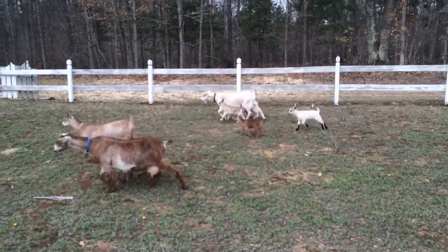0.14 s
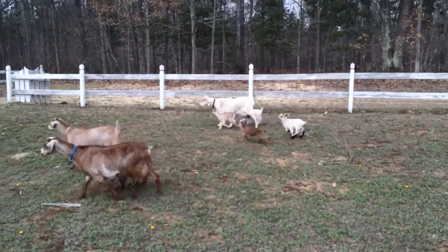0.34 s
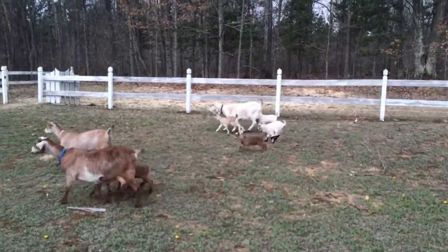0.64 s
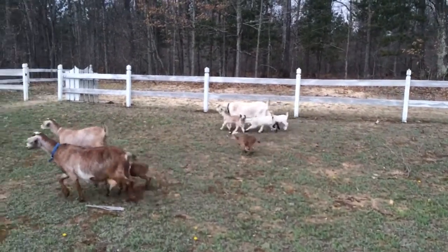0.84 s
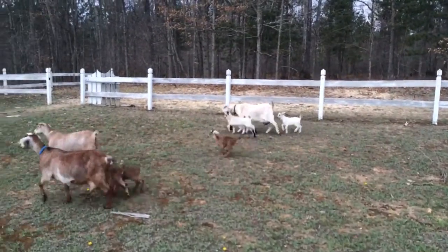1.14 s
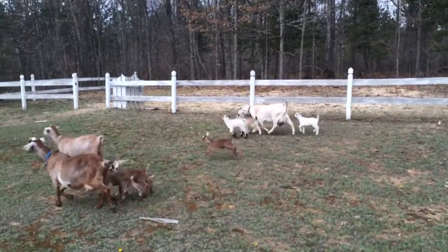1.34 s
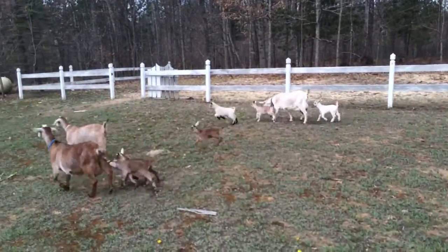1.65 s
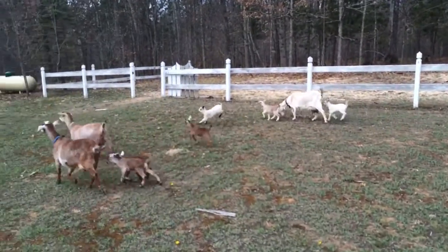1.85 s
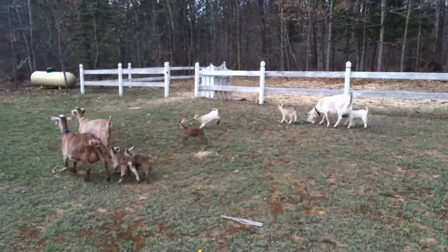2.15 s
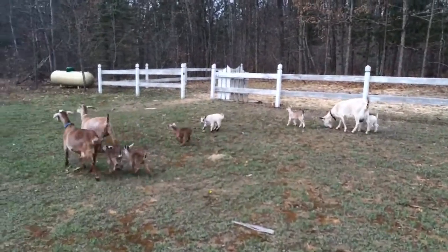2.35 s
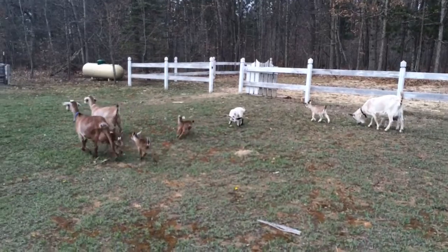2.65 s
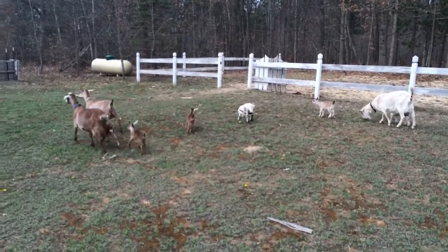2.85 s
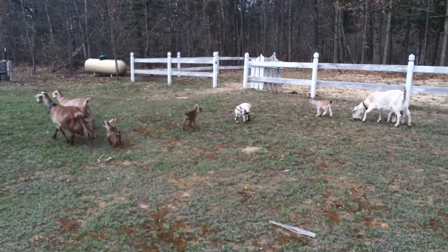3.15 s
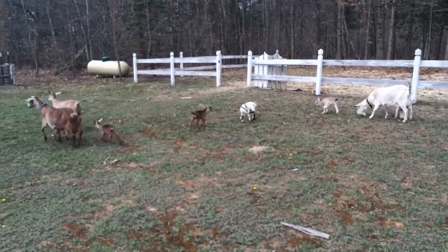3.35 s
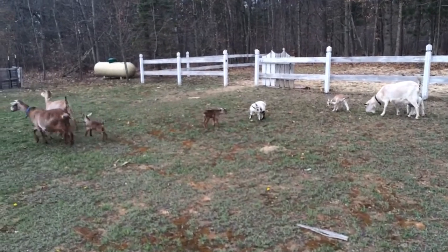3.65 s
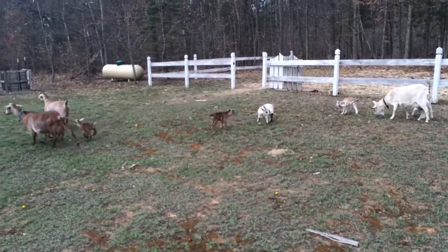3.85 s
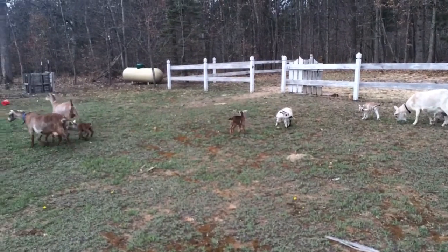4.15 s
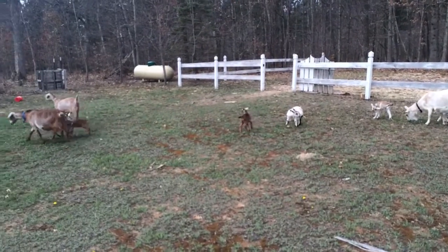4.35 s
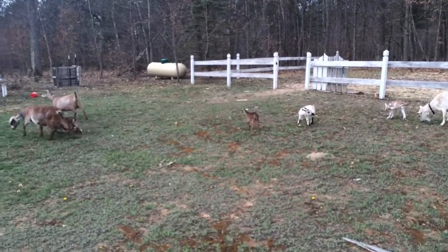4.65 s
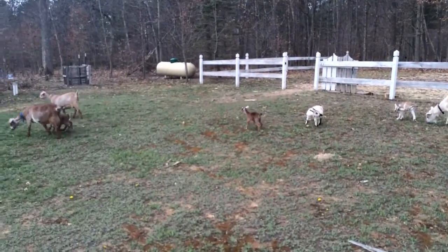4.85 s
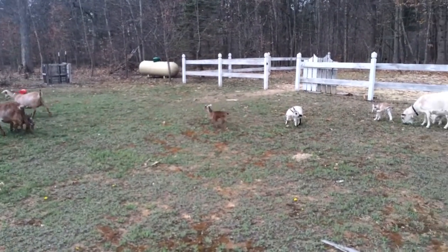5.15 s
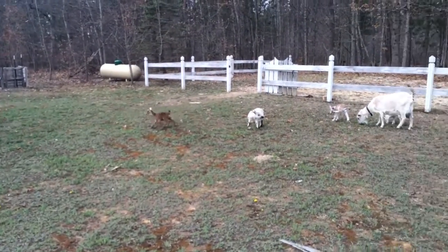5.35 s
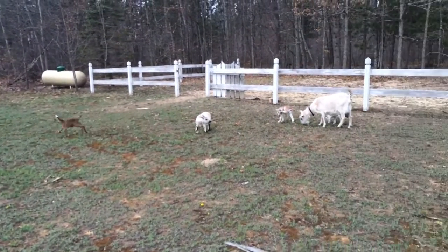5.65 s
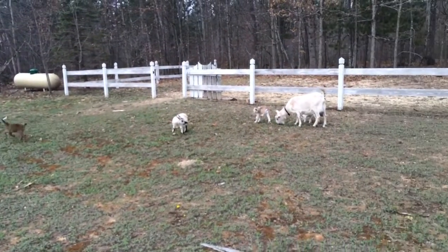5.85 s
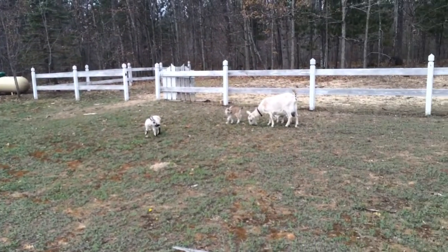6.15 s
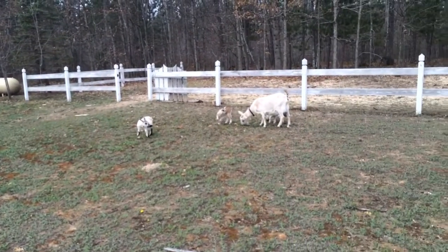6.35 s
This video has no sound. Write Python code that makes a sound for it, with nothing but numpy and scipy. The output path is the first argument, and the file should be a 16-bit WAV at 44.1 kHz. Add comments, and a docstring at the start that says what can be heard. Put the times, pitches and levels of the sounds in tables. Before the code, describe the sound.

High quavering kid bleats, including one long trembling call, echo faintly off nearby woods while wind rumbles and dry grass ticks.

```python
"""In a grassy yard at the edge of a wood, goat kids bleat and the wood throws the calls back.
A bleat is a row of sharp voice pulses coloured by throat and mouth; the long one throbs about nine times
a second. A second kid answers with short gliding calls, and there are brief nasal hums.
Filtered noise makes the wind's rumble and thumps, the soft air and a faint far whistle.
Tiny noise bursts make the dry grass tick underfoot."""
import sys
import numpy as np
from scipy import signal
from scipy.fft import rfft, irfft
from scipy.io import wavfile
from scipy.ndimage import map_coordinates

SR = 44100
rng = np.random.default_rng(int(sys.argv[2]) if len(sys.argv) > 2 else 0)


def digitize_waveform(pressure):
    """Quantize a signal to 16-bit integers and store it at the path in sys.argv[1].

    Rows of a 2-D input are taken as channels; values are limited to [-1, 1].
    """
    field = np.atleast_2d(pressure).T
    bounded = np.clip(field, -1, 1)
    quanta = np.round(bounded * 32767).astype(np.int16)
    wavfile.write(sys.argv[1], SR, quanta)


N = 286209
TIME = np.arange(N) / SR  # seconds

# Steady air of the yard, relative spectrum: f/Hz, density/dB per Hz
AIR_COLOUR = [(18, -21), (30, 3), (81, -10), (148, -11.5), (177, -12), (341, -13), (546, -12.5), (970, -14),
              (1820, -21.5), (3230, -24.5), (7650, -28), (11000, -33), (15500, -38)]
AIR_DB = -62.5  # overall level

# Gusts on the microphone: t/s, level/dB, rise/s
GUSTS = [(.04, -51, 0.12), (0.178, -37.5, 0.017), (0.388, -43, .04), (0.716, -38, 0.061), (1.17, -38, 0.14),
         (1.44, -34, 0.2), (1.75, -42.5, .05), (2.07, -38.5, 0.076), (2.312, -41.5, 0.041),
         (2.521, -48, .2), (2.97, -46.5, 0.013), (5.278, -46.5, 0.011), (5.79, -53.5, 0.013),
         (6.297, -38.5, 0.036), (6.44, -39.5, 0.017)]
# Low wind rumble, relative spectrum: f/Hz, density/dB per Hz
WIND_COLOUR = [(12, -24), (20, -25), (59, 2.5), (107, -1), (191, -8), (335, -23.5), (401, -26.5),
               (826, -52), (1140, -51), (1500, -52), (1950, -74), (3300, -120)]
GUST_FALL_RATIO, CALM_DB = 1.57, -63  # a gust dies more slowly than it rises, back to a light breeze
ROAR_GUST_DB = -33  # gust strength at which the roar is at its full level

# Loudest snaps of dry grass: t/s, level before colouring/dB
SNAPS = [(0.6463, -50.5), (.6758, -52), (0.751, -55), (1.3483, -56), (2.037, -51.5), (2.79, -59),
         (3.251, -52), (4.141, -50.5)]
# Colour of the snaps: f/Hz, gain/dB
SNAP_COLOUR = [(500, -53), (2000, -8), (6000, -0.5), (11000, -1.5), (15000, -4.5)]
CRACKLE_SPREAD_DB = 3.5  # how much the fine crackles differ in level

# Calls with the mouth shut: middle t/s, length/s, pitch f/Hz, glide/Hz per s,
# level before colouring/dB, mouth opening/dB
HUMS = [(0.058, .075, 583, 3240, -55.5, -32), (3.567, .07, 550, 1650, -60, -20)]
# Colour of the hums: f/Hz, gain on a harmonic/dB
NOSE = [(300, 3), (560, 9), (1100, -9), (2500, -19), (4000, -17), (5200, -7), (6500, -22), (7600, -6),
        (9000, -30), (15000, -46)]
# Short calls of the second kid: same columns as the hums
ANSWERS = [(.28, 0.056, 688, 1104, -38, -39), (1.923, 0.062, 602, 2031, -62, -21),
           (3.686, 0.12, 680, 204.5, -45, 10.5), (3.786, 0.091, 691.5, 94, -45, -0.5),
           (3.844, 0.059, 603, 22, -55, -23), (3.908, 0.069, 623.5, 206, -47, -15)]
# Colour of the second kid's throat: f/Hz, gain on a harmonic/dB
SECOND_THROAT = [(300, 14), (680, -18), (1300, -20.5), (1870, -1), (2080, -22.5), (2500, -11), (3400, -6.5),
                 (4100, -4), (4800, -8.5), (5500, -4), (6400, -15), (7500, -6), (9500, -12), (15000, -36)]
ARCH_DB, ARCH_SHARE = -11.5, 0.028  # a short call is this much softer and lower at its ends

# Bleats of the near kid: first accent t/s, end t/s, held pitch f/Hz, held level before colouring/dB,
# accent pitch f/Hz, accent level before colouring/dB, accent decay/s, mouth opening/dB
BLEATS = [(0.11, 0.348, 530.3, -43.5, 573.5, -28.5, 0.012, -4.5),
          (.919, 1.046, 551, -40.5, 577, -25.5, 0.015, -6), (1.594, 1.73, 526.5, -39.5, 575, -26, .013, -4),
          (2.183, 2.428, 538, -43.5, 569.5, -42, 0.045, -6),
          (3.363, 3.669, 567, -41.5, 610.3, -36, .012, -7),
          (4.447, 5.37, 544, -46.5, 577, -33, 0.013, -2.5),
          (5.834, 6.072, 554, -42.5, 582.5, -31, .055, -9)]
# Throbs of effort on the held note: t/s, crest pitch f/Hz, crest level before colouring/dB, rise/s,
# ring of the throat f/Hz, rasp/0-1
THROBS = [(0.2, 625, -18.5, 0.04, 6900, 0.05), (.316, 578, -27, 0.034, 7340, 0.43),
          (1.011, 654, -19.5, 0.028, 7250, 0.09), (1.688, 579.5, -25, 0.023, 7140, 0),
          (2.272, 621, -22, 0.024, 7330, 0), (2.384, 595.5, -26, 0.019, 6300, 0.12),
          (3.442, 642.7, -21, 0.032, 7100, 0.08), (3.54, 651, -19, 0.044, 6230, 0.06),
          (3.642, 671, -18, 0.033, 6700, 0.11), (4.54, 644, -22.5, 0.036, 6630, 0.11),
          (4.64, 657, -20.5, 0.042, 7140, .03), (4.748, 665, -21, 0.044, 5840, 0),
          (4.858, 661.6, -23, 0.033, 6600, 0), (4.98, 648.4, -24, 0.023, 6800, 0.22),
          (5.085, 681, -23, 0.032, 7000, 0.34), (5.2, 639, -26, .038, 6540, 1),
          (5.306, 716, -21.5, .036, 6700, 0.4), (5.938, 638, -25, 0.038, 6320, 0.1),
          (6.04, 632, -25.5, 0.024, 7220, 0.03)]
# Colour of the near kid's throat, before the ring shifts it: f/Hz, gain on a harmonic/dB
THROAT = [(300, -51), (600, -38), (1300, -35), (2400, -24), (2900, -32.5), (3450, -27), (4000, -10.5),
          (4800, -24), (5800, -15), (7500, -13), (8100, -19.5), (9000, -30.5), (11200, -35.5), (15000, -62)]
# A bleat scoops up to its first accent with the lips shut; then the mouth opens and the note slowly tightens
LEAD_S, ACCENT_RISE_S, SCOOP_HZ_PER_S, LEAD_DB_PER_S = .042, 0.011, 2400, 168
LEAD_DB = -9  # the scoop ends this far below the held note, apart from the accent
SHUT_DB, OPEN_S = -23, 0.074
TIGHTEN_HZ_PER_S, SWELL_DB_PER_S = 42, 11
THROB_FALL_S = .022
PITCH_RISE_SHARE, PITCH_FALL_S = .66, .0135  # the pitch arch of a throb is narrower than its swell

# Time the wood's tail takes to die by 60 dB: f/Hz, t60/s
WOOD_T60 = [(500, .4), (1800, .55), (4000, .5), (7000, .55), (12000, .36)]
# Colour of the wood's tail: f/Hz, gain/dB
WOOD_COLOUR = [(500, 6), (1800, -9.5), (4000, -0.5), (7000, -8), (9800, 7.5), (14000, 2)]

# Hardest eddies that strike the microphone: t/s, level/dB, centre f/Hz, time from peak to half swell/s
BUFFETS = [(0.59, -24, 184, 0.0096), (0.917, -33, 133.6, 0.0098), (1.066, -22.5, 89, 0.0033),
           (1.093, -30, 327, 0.0025), (1.161, -25.5, 387, 0.01), (1.178, -25.5, 266, 0.0098),
           (1.373, -33, 225, 0.0048), (1.564, -26, 253, 0.0048), (1.581, -23, 238, 0.0028),
           (1.971, -31, 138, 0.0094), (2.032, -18.5, 195, 0.0094), (2.157, -27.5, 285, 0.011),
           (2.597, -29.5, 210, 0.0097), (4.117, -36.5, 119, .011), (6.3, -26, 118, 0.014)]

# Swells of a thin, far whistle: t/s, level/dB, half length/s
WHISTLE = [(4.2, -74, .1), (6.377, -74, 0.33)]

EDGE_HZ = 15500  # upper limit of the whole sound


def gain_of(db):
    """Turns decibels into an amplitude factor."""
    return 10 ** (np.asarray(db) / 20)


def evened(x):
    """Scales a sound to an average strength (rms) of one."""
    return x / np.sqrt(np.mean(x ** 2) + 1e-20)


def read(points, hz):
    """Reads values between the points of a spectrum, on a log-frequency axis."""
    f, value = np.transpose(points)
    return np.interp(np.log(hz + 1), np.log(f + 1), value)


def add(mix, s, sound):
    """Mixes a sound in at a given time in seconds."""
    part = mix[max(round(s * SR), 0):][:len(sound)]
    part += sound[:len(part)]


def colour(x, points, size=8192):
    """Filters with the given spectrum; the filter rings after each pulse, never before."""
    log_gain = np.log(gain_of(read(points, abs(np.fft.fftfreq(size, 1 / SR)))))
    response = np.exp(np.conj(signal.hilbert(log_gain)))  # minimum phase
    taps = np.fft.ifft(response).real[:size // 2]
    return signal.oaconvolve(x, taps)[:len(x)]


def wander(count, hz):
    """Smooth random motion of unit size up to about the given rate, repeating every two seconds."""
    softening = np.exp(-(np.arange(SR + 1) / (2 * hz)) ** 2)
    slow = irfft(rfft(rng.standard_normal(2 * SR)) * softening)
    return np.resize(evened(slow), count)


def resonate(x, hz, width):
    """A resonance with a peak gain of one, whose pitch may follow a curve."""
    turn = np.exp(2j * np.pi * np.cumsum(hz * np.ones(len(x))) / SR)
    r = np.exp(-np.pi * width / SR)
    lowered = x / turn + 1e-18  # shifts the resonance to zero frequency for filtering
    return 2 * (turn * signal.lfilter([1 - r], [1, -r], lowered)).real


def bell(t, rise, fall):
    """A smooth bump of height one at time zero."""
    return np.exp(-(t / np.where(t < 0, rise, fall)) ** 2)


def air():
    """The soft, steady wash of the open yard: coloured noise."""
    return evened(colour(rng.standard_normal(N), AIR_COLOUR)) * gain_of(AIR_DB)


def gusts():
    """Wind strength in dB: the power of gusts piles up on a light breeze."""
    power = sum(gain_of(db) ** 2 * bell(TIME - s, rise, GUST_FALL_RATIO * rise) for s, db, rise in GUSTS)
    return 10 * np.log10(power + gain_of(CALM_DB) ** 2)


def wind(lumps_db=5.5, roar_db=-51, roar_hz=440, roar_width=330, growth=1.53):
    """Lumpy low turbulence follows the gusts; the strong ones add a higher roar."""
    lumps = gain_of(lumps_db * wander(N, 69))
    gust_db = gusts()
    rumble = evened(colour(rng.standard_normal(N) * lumps, WIND_COLOUR)) * gain_of(gust_db)
    roar = rng.standard_normal(N) * lumps
    roar = resonate(resonate(roar, roar_hz, roar_width), roar_hz, roar_width)
    # growth: dB the roar drops for each dB the gust is below full strength
    roar_level = gain_of(roar_db + growth * np.minimum(gust_db - ROAR_GUST_DB, 0))
    return rumble + evened(roar) * roar_level


def grass(decay_s=0.0023, crackle_db=-68, per_s=70, size=2048):
    """Stems snap underfoot as tiny noise bursts, with finer crackle that thins out."""
    out, age = np.zeros(N), TIME[:size] / decay_s
    crush = age * np.exp(1 - age)  # a stem bends briefly before it breaks
    for s, db in SNAPS:
        snap = rng.standard_normal(size) * crush
        add(out, s - decay_s, gain_of(db) * snap)
    walking = np.interp(TIME, [2.7, 3.4], [1, .15])  # share of the full crackle rate
    breaks = rng.random(N) < walking * per_s / SR
    extra_db = CRACKLE_SPREAD_DB * np.minimum(rng.exponential(1, N), 3)
    stems = breaks * gain_of(crackle_db + extra_db)
    out += signal.oaconvolve(stems, rng.standard_normal(size) * crush)[:N]
    return colour(out, SNAP_COLOUR)


def folds(hz, rasp, jitter=0.005, rasp_jitter=0.077, shimmer=0.087, rasp_shimmer=0.35, hiss=0.2, count=30):
    """Vocal folds give one sharp pulse and one puff of air a cycle; under strain cycles turn uneven."""
    n = len(hz)
    unevenness = (jitter + rasp_jitter * rasp) * wander(n, 390)
    turns = np.cumsum(hz * (1 + unevenness)) / SR  # cycles so far
    pulses = np.sqrt(2) * sum(np.cos(2 * np.pi * k * turns) for k in range(1, count))
    spread = shimmer + rasp_shimmer * rasp
    luck = rng.standard_normal(SR)[np.round(turns).astype(int)]  # one draw for each pulse
    strength = np.maximum(1 + spread * luck, 0) / np.sqrt(1 + spread ** 2)
    noise = np.diff(rng.standard_normal(2 * SR))[:n]
    puffs = evened(np.exp(-(turns % 1) / .5) * noise)
    return pulses * strength + hiss * np.sqrt(count) * puffs


def voice(t, hz, db, opening_db, throbs, throat, mouth_hz=1760, mouth_width=235, ring_width=800, ring=0.3,
          slack_db=-5, sag=.03, slack_s=0.047, slack_mouth_db=-10, jaw_s=0.04, peaked=2.09, waver=.006,
          breath_db=-35, breath_growth=0.72, breath_hz=10500, breath_width=4500):
    """Each throb lifts pitch and level together, sweeping the third harmonic through the mouth resonance."""
    rasp, ring_hz = np.zeros(len(t)), np.full(len(t), 7400.)
    for at, crest_hz, crest_db, rise, crest_ring_hz, strain in throbs:
        # the voice sinks and the jaw closes after each push
        slack = np.exp(-((t - at - slack_s) / .018) ** 2)
        hz, db = hz * (1 - sag * slack), db + slack_db * slack
        opening_db = opening_db + slack_mouth_db * bell(t - at - jaw_s, .018, 0.02)
        push = np.exp(-abs((t - at) / np.where(t < at, rise, THROB_FALL_S)) ** peaked)
        hz = hz + (crest_hz - hz) * bell(t - at, PITCH_RISE_SHARE * rise, PITCH_FALL_S)
        db = db + (crest_db - db) * push
        ring_hz = ring_hz + (crest_ring_hz - ring_hz) * push
        # the voice cracks just before the crest
        rasp = rasp + strain * np.exp(-((t - at + 0.014) / 0.014) ** 2)
    fade = np.clip(np.minimum((t - t[0]) / 0.0048, (t[-1] - t) / 0.021), 0, 1)
    edges = np.sin(np.pi / 2 * fade) ** 2
    drive = folds(hz * (1 + waver * wander(len(t), 40)), rasp) * gain_of(db) * edges

    mouth = resonate(resonate(drive, mouth_hz, mouth_width), mouth_hz, mouth_width)
    mouth = mouth * gain_of(-11 * rasp)  # a cracked voice no longer feeds the low resonance
    upper = colour(drive, throat)
    shut = 1 - gain_of(0.58 * np.minimum(opening_db, 0))
    upper = upper - shut * resonate(upper, 4320, 1170)  # closed lips also damp the middle of the voice
    ringing = ring * resonate(upper, ring_hz, ring_width)

    # air hisses through the mouth, also between the pushes
    breath = rng.standard_normal(2 * SR)[:len(t)]
    breath = resonate(resonate(breath, breath_hz, breath_width), breath_hz, breath_width)
    breath = evened(breath) * edges * gain_of(breath_db + breath_growth * db)
    return t[0], upper + ringing + gain_of(opening_db) * mouth + breath


def short_call(at, length, hz, glide, db, open_db):
    """One arched, gliding syllable: times, pitch, level and mouth opening."""
    t = np.arange(-length / 2, length / 2, 1 / SR)
    ends = (2 * t / length) ** 2  # zero in the middle, one at both ends
    return at + t, hz * (1 - ARCH_SHARE * ends) + glide * t, db + ARCH_DB * ends, open_db


def bleat(at, end, note_hz, note_db, accent_hz, accent_db, accent_s, open_db):
    """The held note of a bleat: times, pitch, level and mouth opening."""
    t = np.arange(at - LEAD_S, end, 1 / SR)
    early, age = np.maximum(at - t, 0), np.maximum(t - at, 0)  # seconds before and after the accent
    accent = bell(t - at, ACCENT_RISE_S, accent_s)
    hz = note_hz + (accent_hz - note_hz) * bell(age, accent_s, 1.6 * accent_s)
    hz = hz - SCOOP_HZ_PER_S * early + TIGHTEN_HZ_PER_S * age
    held_db = note_db + np.where(t < at, LEAD_DB - LEAD_DB_PER_S * early, SWELL_DB_PER_S * age)
    db = held_db + (accent_db - held_db) * accent
    return t, hz, db, open_db + SHUT_DB * np.maximum(1 - age / OPEN_S, 0) ** 2


def stretched(throat, throbs, usual_ring_hz=6750):
    """The upper resonances of a bleat move with the average ring of its throbs."""
    ring_hz = np.mean([throb[4] for throb in throbs])
    ratio = ring_hz / usual_ring_hz
    return [(hz * np.interp(hz, [4500, 8000], [1, ratio]), db) for hz, db in throat]


def ground(x, delay_s=0.0010787, sway_s=0.0002115, bounce=0.44):
    """The call also bounces off the turf; as the kid moves, the notches drift through its harmonics."""
    late = (delay_s + sway_s * wander(N, 2.9)) * SR
    bounced = map_coordinates(x, [np.arange(N) - late], order=3)
    return (x + bounce * bounced) / np.sqrt(1 + bounce ** 2)


def kids():
    """The nasal hums, the near kid's throbbing bleats and the smoother answers, with the turf's bounce."""
    out = np.zeros(N)
    for row in HUMS:
        add(out, *voice(*short_call(*row), [], NOSE, ring=0))
    for row in BLEATS:
        throbs = [throb for throb in THROBS if row[0] < throb[0] < row[1]]
        add(out, *voice(*bleat(*row), throbs, stretched(THROAT, throbs)))
    for row in ANSWERS:
        add(out, *voice(*short_call(*row), [], SECOND_THROAT, mouth_hz=1518, ring=0.11))
    return ground(out)


def wood(x, build_s=0.0021, scatter_db=-14, fence_s=0.099, fence_db=-31, blur_s=.0001, blur_hz=70):
    """Trunks scatter the calls into a bright, thin, blurred tail; the fence returns one echo."""
    trunks = rng.random(SR) < 3000 / SR  # about 3000 reflections a second
    taps = rng.standard_normal(SR) * trunks * (1 - np.exp(-TIME[:SR] / build_s))
    # each frequency dies away at its own speed
    hz, t, z = signal.stft(taps, SR, nperseg=256)
    fading = gain_of(-60 * t / read(WOOD_T60, hz)[:, None])
    tail = signal.istft(z * fading, SR, nperseg=256)[1]
    tail = colour(tail * gain_of(scatter_db) / np.linalg.norm(tail), WOOD_COLOUR)
    add(tail, fence_s, gain_of([fence_db]))
    echo = signal.fftconvolve(x, tail)[:N]
    # a small random shift in time blurs the pitch
    return map_coordinates(echo, [np.arange(N) - blur_s * SR * wander(N, blur_hz)], order=3)


def buffets(steepness=3.7, flutter_db=-28, flutter_hz=510, size=8192):
    """Each eddy on the microphone is a brief low thump with a lighter flutter on top."""
    out, hz = np.zeros(N), np.fft.rfftfreq(size, 1 / SR)
    t = (np.arange(size) - size // 2) / SR
    flutter = gain_of(flutter_db) * np.exp(-((hz - flutter_hz) / 190) ** 2)
    for s, db, centre_hz, length in BUFFETS:
        swell = 1 / np.cosh(t / length * 1.31)
        low = hz / centre_hz / (1 + (hz / centre_hz) ** (steepness + 1))
        band = low + flutter * centre_hz / 260
        thump = irfft(rfft(swell * rng.standard_normal(size)) * band)
        add(out, s + t[0], gain_of(db) * thump * np.linalg.norm(swell) / np.linalg.norm(thump))
    return out


def whistle(hz=4600, width=350):
    """A faint fuzzy tone from far off: noise through two narrow resonances."""
    tone = resonate(resonate(rng.standard_normal(N), hz, width), hz, width)
    swells = sum(gain_of(db) * bell(TIME - s, length, length) for s, db, length in WHISTLE)
    return evened(tone) * swells


def scene():
    """Goats and their echo over wind, grass, air and the far whistle, in one channel."""
    goats = kids()
    return (air() + wind() + grass() + goats + wood(goats) + buffets() + whistle())[None]


def record(dry, low_cut_hz=40):
    """The microphone's low cut, then the upper band limit."""
    thinned = signal.sosfilt(signal.butter(2, low_cut_hz, "high", fs=SR, output="sos"), dry)
    band_limit = signal.firwin(511, EDGE_HZ, window=("kaiser", 9), fs=SR)
    return signal.oaconvolve(thinned, band_limit[None], "same")


dry = scene()
out = record(dry)
digitize_waveform(out)
```